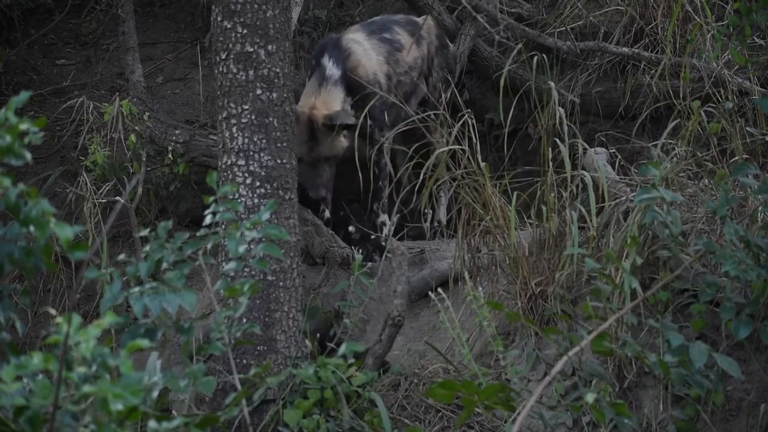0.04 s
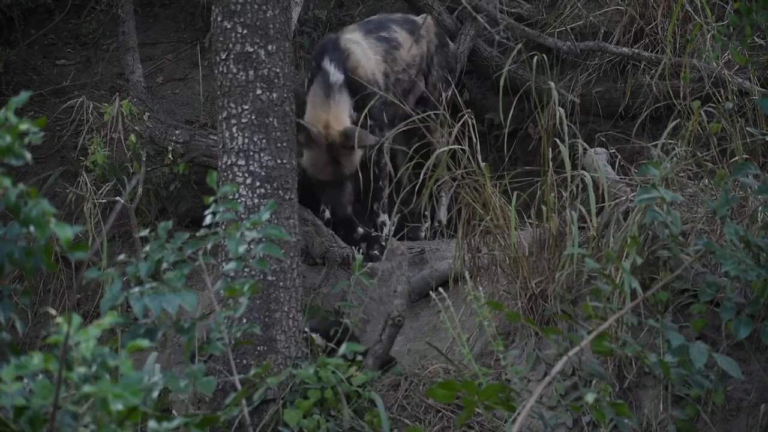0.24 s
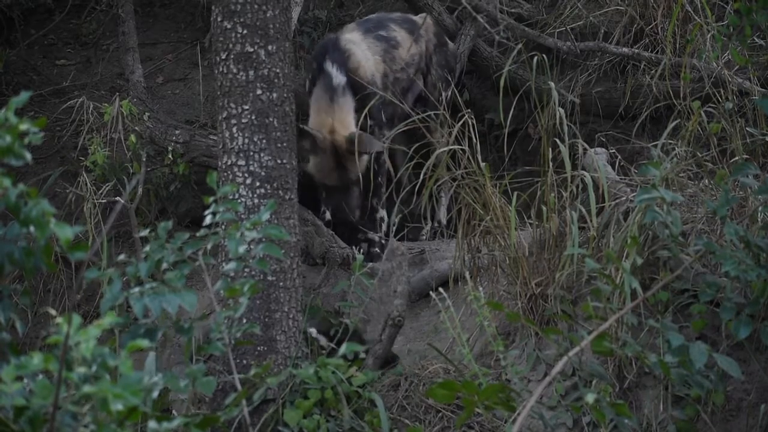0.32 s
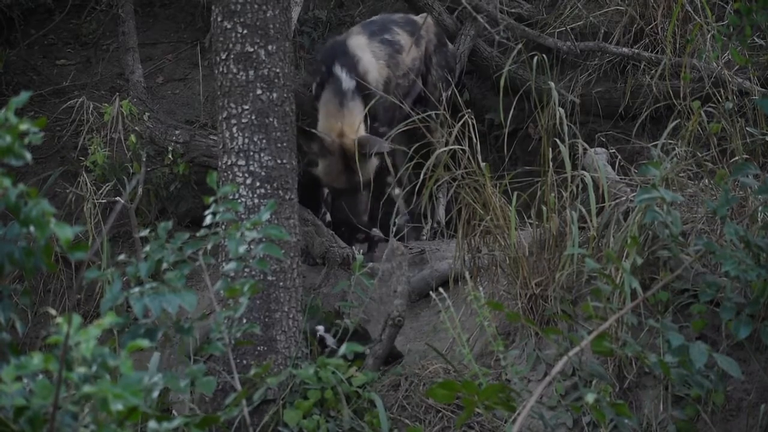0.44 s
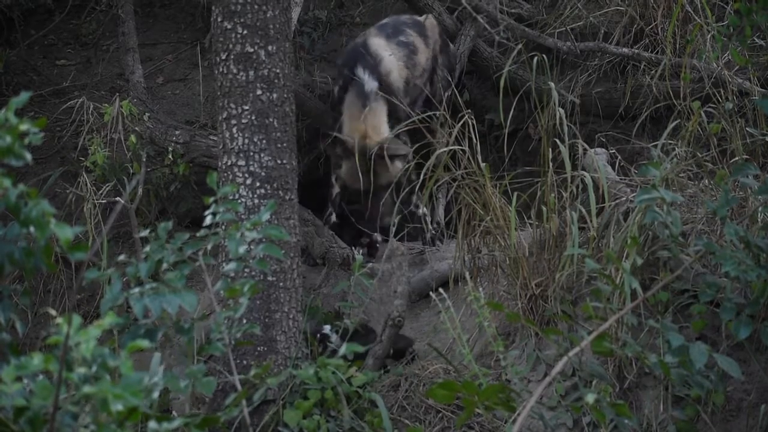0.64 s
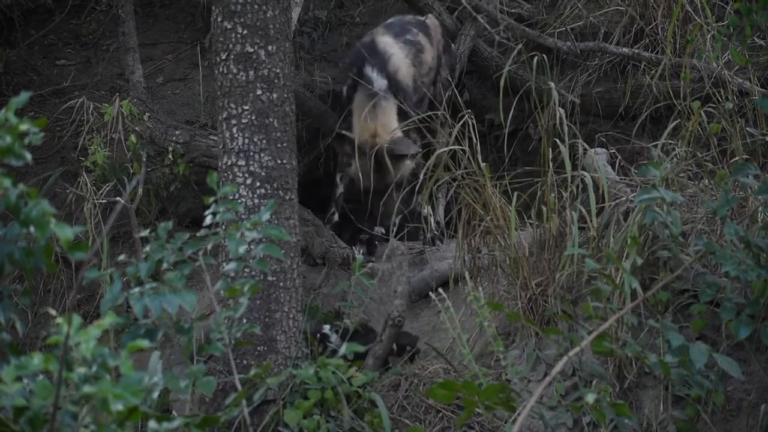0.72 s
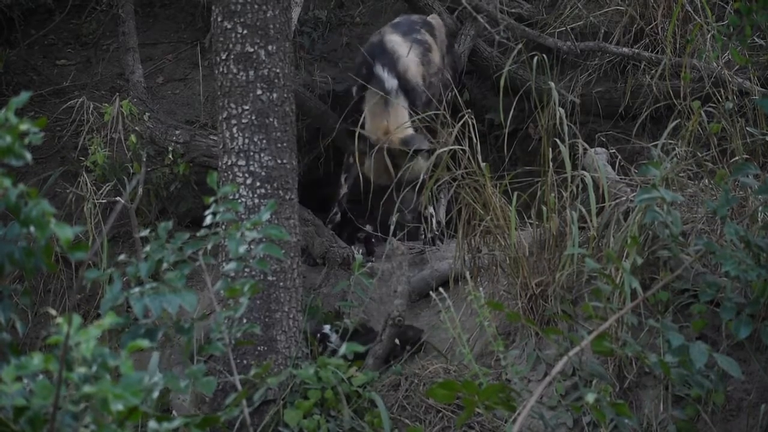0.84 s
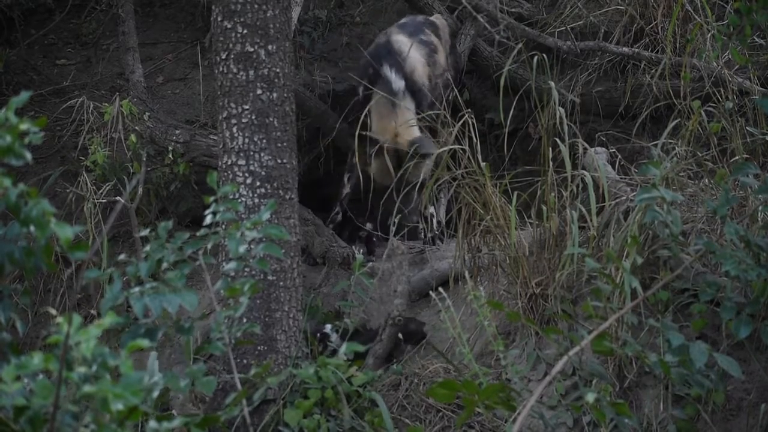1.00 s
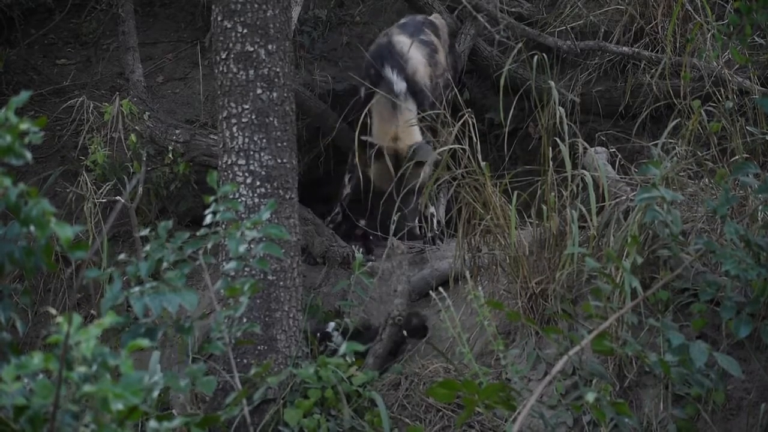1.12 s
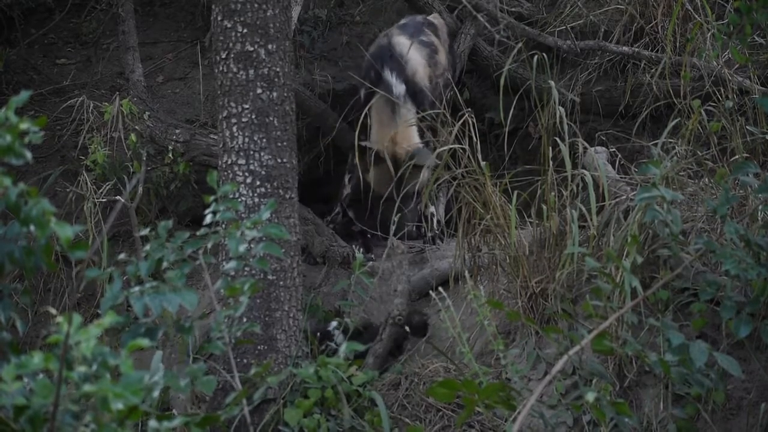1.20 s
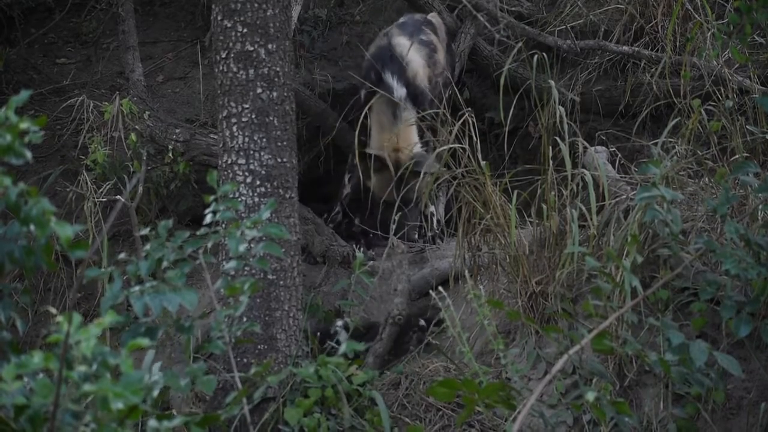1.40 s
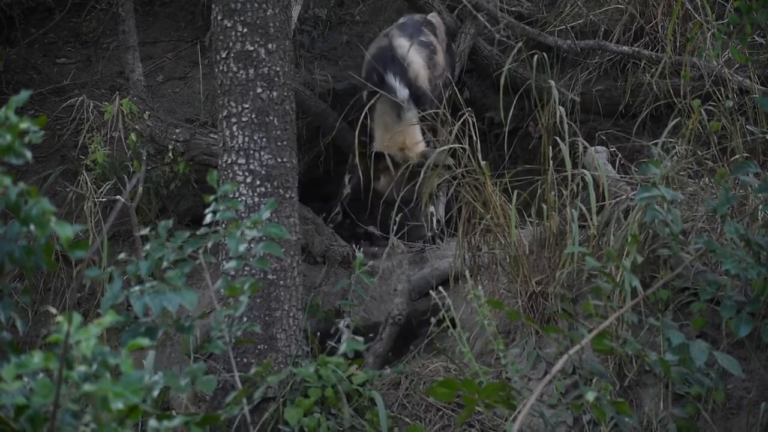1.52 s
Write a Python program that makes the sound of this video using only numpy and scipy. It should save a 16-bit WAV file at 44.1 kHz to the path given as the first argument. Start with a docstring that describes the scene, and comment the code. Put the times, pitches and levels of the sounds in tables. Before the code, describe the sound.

Three whistle-like squeals from a wild dog sound right of the microphone, each starting raspy, sliding up and breaking lower. Soft whines and peeps slip between and under them, in slightly echoing woods with faint hiss and far insects.

```python
"""At a den in a wooded bank, a wild dog gives three thin, high squeals off to the right.
Each starts raspy, slides up, sags as it swells and breaks down to a lower note. Faint low whines
and tiny peeps sound between and under them; the last whine shakes the squeal into side tones.
The bank and trees echo, over a quiet outdoor hiss and far insects."""
import sys
import numpy as np
from scipy import signal
from scipy.fft import rfft, irfft
from scipy.io import wavfile

SR = 44100
rng = np.random.default_rng(int(sys.argv[2]) if len(sys.argv) > 2 else 0)


def transcribe(signal):
    """Save signal, clipped to [-1, 1], as a 16-bit WAV file at the path in sys.argv[1]."""
    frames = np.atleast_2d(signal).T
    limited = np.clip(frames, -1, 1)
    pcm = np.round(limited * 32767).astype(np.int16)
    wavfile.write(sys.argv[1], SR, pcm)


N = 68355
TIME, FREQS = np.arange(N) / SR, np.fft.rfftfreq(N, 1 / SR)


def amp(db):
    """Turns decibels into a gain."""
    return 10 ** (np.asarray(db) / 20)


def unit(x):
    """Scales a signal to an average power of 1."""
    return x / np.sqrt(np.mean(abs(x) ** 2) + 1e-20)


def read(points, hz):
    """Looks up a frequency in a table, sliding between rows on a log scale."""
    f, value = np.transpose(points)
    return np.interp(np.log(hz + 1), np.log(f + 1), value)


def pan(db):
    """Left and right gains; negative dB moves a sound to the right."""
    return unit(amp([[db / 2], [-db / 2]]))


def wander(rate_hz):
    """A smooth random wobble, up to about this rate."""
    return unit(irfft(rfft(rng.standard_normal(N)) * np.exp(-(FREQS / rate_hz) ** 2), N))


def gate(start, end, fade_s):
    """Fades a sound in and out."""
    return np.sin(np.pi / 2 * np.clip(np.minimum(TIME - start, end - TIME) / fade_s + .5, 0, 1)) ** 2


def follow(rows):
    """Turns a call's rows into an on-off curve, then one curve for each column after time."""
    times, *columns = np.transpose(rows)
    return [gate(times[0], times[-1], fade_s=.004)] + [np.interp(TIME, times, c) for c in columns]


def phase_of(hz, jitter):
    """The running phase of a slightly unsteady pitch."""
    return 2 * np.pi * np.cumsum(hz * (1 + jitter * wander(rate_hz=200))) / SR


def tone(phase, db):
    """A pure tone at an average (rms) level."""
    return np.sqrt(2) * amp(db) * np.sin(phase)


# The colour of the hiss. Each row: frequency in Hz, relative level in dB.
HISS_COLOUR = [(15, -32), (25, -10), (109, -3.5), (213, -6.5), (264, -6.5), (373, -10), (529, -12),
               (573, -11), (749, -12), (978, -13), (1090, -13.5), (2070, -15.5), (2300, -15.5), (2500, -16),
               (6370, -17.5), (8100, -13.5), (15000, -21.5)]
# How alike the two sides are. Each row: frequency in Hz, likeness (1 means the same).
HISS_LIKENESS = [(30, .995), (60, .9995), (170, .999), (350, 0.99), (700, 0.68), (1400, 0.1), (3000, 0.033),
                 (15000, 0.034)]
# Where the hiss sits. Each row: frequency in Hz, left minus right in dB.
HISS_PAN = [(30, 0), (400, -1), (1500, -2.5), (6000, -4), (14000, -2.5)]

def outdoor_hiss():
    """Open air: a soft rumble shared by both sides, and a wide hiss above it."""
    left, other = rfft(rng.standard_normal((2, N)))
    same = read(HISS_LIKENESS, FREQS)
    right = same * left + np.sqrt(1 - same ** 2) * other
    tilt = amp(read(HISS_PAN, FREQS) / 2)
    spectrum = np.array([left * tilt, right / tilt]) * amp(read(HISS_COLOUR, FREQS))
    return amp(-61) * unit(irfft(spectrum, N))


# The insects' high hum. Each row: centre in Hz, width in Hz, level in dB.
INSECT_BANDS = [(7720, 690, -72), (10890, 380, -74)]

def insects():
    """Far insects blend into steady, narrow bands of noise."""
    out = 0
    for centre, width, db in INSECT_BANDS:
        band = np.exp(-(2 * (FREQS - centre) / width) ** 2)
        out = out + amp(db) * unit(irfft(rfft(rng.standard_normal((2, N))) * band, N))
    return out


# The tune of each squeal, one list per squeal. Each row: time in seconds, pitch in Hz, level in dB.
SQUEAL_TUNES = [
    [(.16, 6280, -80), (.18, 6820, -45.5), (.212, 7170, -34.5), (.228, 7163, -25.5), (.243, 6990, -39.5),
     (.266, 7076, -23), (.296, 7083, -27.5), (.324, 6957, -25), (.35, 6924, -23), (.362, 6710, -29),
     (.371, 5335, -46.5), (.385, 5420, -34)],
    [(.611, 5730, -52.5), (.625, 6580, -46.5), (.647, 6780, -44.5), (.676, 7330, -38.5), (.695, 7165, -27),
     (.716, 6986, -32), (.747, 7015, -20.5), (.759, 6800, -32.5), (.766, 5460, -44.5), (.78, 5460, -37)],
    [(1.265, 5500, -54), (1.282, 5530, -41), (1.288, 6100, -73), (1.298, 6720, -36), (1.316, 6610, -42.5),
     (1.336, 6499, -27.5), (1.358, 6480, -20), (1.372, 6518, -31), (1.386, 6523, -25), (1.392, 5244, -38),
     (1.398, 5530, -32)],
]
# The voice of each squeal. Each row, all in dB: left minus right, the half-pitch tone and the octave
# compared with the note, level of the opening rasp.
SQUEAL_VOICES = [(-12.5, -54, -30.5, -56.5), (-12.5, -34.5, -22, -56), (-18, -44, -26, -53)]
# How the muzzle colours the octave. Each row: frequency in Hz, gain in dB.
MUZZLE_COLOUR = [(10500, -2), (12300, -3), (13000, 1), (14200, -3), (15000, -17)]
# The colour of the opening rasp. Each row: frequency in Hz, relative level in dB.
RASP_COLOUR = [(1500, -30), (3300, -10.5), (4700, -3), (6300, 2), (8500, -8.5), (12500, -3.5), (15000, -32)]

def squeal(rows, pan_db, half_db, octave_db, rasp_db, shake):
    """A high note that clears from a raspy start; shaking by the low voice adds side tones."""
    rasp_peak_s, base_db = .0345, -37.5
    on, hz, db = follow(rows)
    age = np.maximum(TIME - rows[0][0], 0) / rasp_peak_s
    raspy = age * np.exp((1 - age ** 2) / 2)  # rises to 1, then dies away
    phase = phase_of(hz, jitter=.0006 + .008 * raspy)
    db = db + .9 * wander(rate_hz=60.5)  # the level flickers
    half = tone(phase / 2, db + half_db) * (1 + .5 * wander(rate_hz=40))  # comes and goes
    octave = tone(2 * phase, db + octave_db + read(MUZZLE_COLOUR, 2 * hz))
    # Side tones grow only a little as the note swells, and the breath around it hardly at all.
    swell_db = db - base_db
    spin = np.exp(1j * phase)  # multiplying by this moves a sound up by the note's pitch
    sides = np.sqrt(2) * amp(base_db + .25 * swell_db) * (shake[0] * spin + shake[1] * spin ** 2).real
    breath = unit(wander(rate_hz=250) * spin.imag + wander(rate_hz=250) * spin.real)
    breath *= amp(base_db - 13 + .031 * swell_db)
    rasp = unit(irfft(rfft(rng.standard_normal(N)) * amp(read(RASP_COLOUR, FREQS)), N))
    return pan(pan_db) * on * (tone(phase, db) + octave + half + sides + breath + amp(rasp_db) * raspy * rasp)


def woods_echo(sound):
    """Sound scatters densely off the near bank and leaves a faint, long tail among the trees."""
    t, delay_s = TIME[:SR], .011
    bank, trees = rng.standard_normal((2, 2, SR)) * np.clip(t / delay_s - .5, 0, 1)
    echo = 0
    for noise, db, decay_s in [(bank, -5, .14), (trees, -18.5, .55)]:
        tail = noise * amp(-60 * t / decay_s)
        echo = echo + amp(db) * tail / np.linalg.norm(tail, axis=1, keepdims=True)
    return signal.fftconvolve(sound[None], pan(db=-6) * echo, axes=1)[:, :N]


# The tune of each short whine, one list per whine. Each row: time in seconds, pitch in Hz, level in dB.
WHINE_TUNES = [
    [(.287, 660, -73), (.312, 652, -61), (.333, 710, -73)],
    [(.499, 590, -65.5), (.522, 627, -64), (.542, 706, -55), (.562, 700, -58), (.579, 662, -75)],
    [(.742, 543, -65), (.762, 619, -63), (.78, 640, -57.5), (.81, 658, -56.5), (.82, 552, -64),
     (.836, 550, -72)],
]

def whine(rows):
    """A soft, wavering low note with three harmonics (tones at 1, 2 and 3 times its pitch)."""
    on, hz, db = follow(rows)
    phase = phase_of(hz, jitter=.018)
    voice = sum(tone(k * phase, db + gain_db) for k, gain_db in enumerate([-2.5, -8.5, -19.5], 1))
    return pan(db=-4) * on * voice


# The peeps. Each row: start in seconds, length in seconds, pitch in Hz, level in dB.
PEEP_NOTES = [(.593, 0.017, 7830, -49), (.637, 0.01, 3456, -61), (0.859, 0.031, 857, -65.5),
              (1.253, 0.012, 2695, -57.5)]

def peep(start, length, hz, db):
    """One tiny note that fades in and straight out again."""
    return gate(start, start + length, fade_s=length / 2) * tone(phase_of(hz, jitter=.006), db)


# The whine under the last squeal. Each row: time in seconds, pitch in Hz, level of the lowest tone
# in dB, level of the overtones in dB.
LONG_WHINE_TUNE = [(1.228, 640, -68.5, -94), (1.262, 681, -62, -78), (1.298, 737, -58, -67.5),
                   (1.322, 807, -65, -58), (1.343, 850, -66.5, -62.5), (1.366, 805, -71.5, -57.5),
                   (1.38, 727, -57.5, -72), (1.394, 620, -61.5, -84)]
# Its nasal colour. Each number: dB added to the overtone level, for harmonics 2 to 6.
NASAL_DB = [-19, 2.5, -12, -14, -21]
# Where the side tones lie. Each number: distance from the squeal, in steps of the whine's pitch.
SIDE_TONE_STEPS = [-2, -1, 1, 2, 3]
# Their relative strength. Each row, one per step: dB beside the squeal's note, dB beside its octave.
SIDE_TONE_DB = [(-26, -48), (-13, -22), (-23, -52), (-23, -60), (-27, -60)]

def long_whine():
    """The low voice rises, turns nasal and falls. Returns its sound and the shake it gives the squeal."""
    on, hz, low_db, overtone_db = follow(LONG_WHINE_TUNE)
    phase = phase_of(hz, jitter=.0093)
    overtones = sum(tone(k * phase, overtone_db + db) for k, db in enumerate(NASAL_DB, 2))
    shake = 0
    for step, db in zip(SIDE_TONE_STEPS, SIDE_TONE_DB):
        flicker = 1 + .45 * wander(rate_hz=200)
        shake = shake + amp(db)[:, None] * np.exp(1j * step * phase) * flicker
    strength = np.minimum(amp(overtone_db + 66.5), 1)  # full once the overtones reach -66.5 dB
    return pan(db=-7.5) * on * (tone(phase, low_db) + overtones), on * shake * strength


def scene():
    """The dog's calls and their echo, over hiss and insects."""
    whines, shake = long_whine()
    whines = whines + sum(whine(rows) for rows in WHINE_TUNES)
    squeals = sum(squeal(rows, *voice, shake) for rows, voice in zip(SQUEAL_TUNES, SQUEAL_VOICES))
    peeps = pan(db=-11) * sum(peep(*row) for row in PEEP_NOTES)
    echo = woods_echo((squeals + peeps + whines).mean(0))
    return amp(-5.5) * (squeals + peeps + echo) + whines + outdoor_hiss() + insects()


def record(dry):
    """Cuts off the highest treble, above 14900 Hz."""
    low_pass = signal.firwin(511, 14900, window=("kaiser", 9), fs=SR)
    return signal.oaconvolve(dry, low_pass[None], "same")


dry = scene()
out = record(dry)
transcribe(out)
```